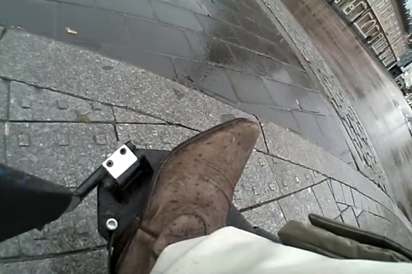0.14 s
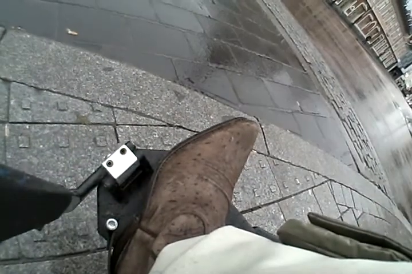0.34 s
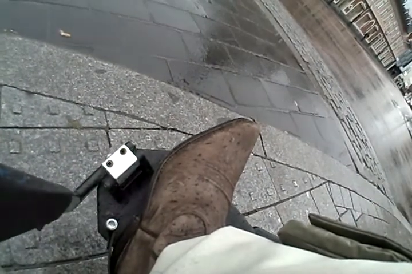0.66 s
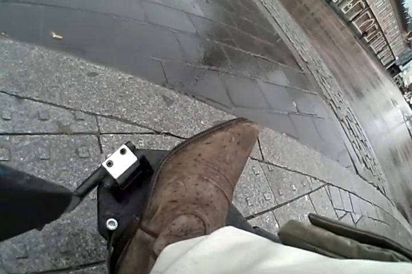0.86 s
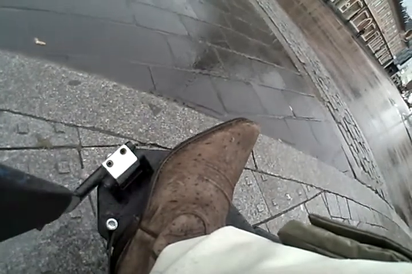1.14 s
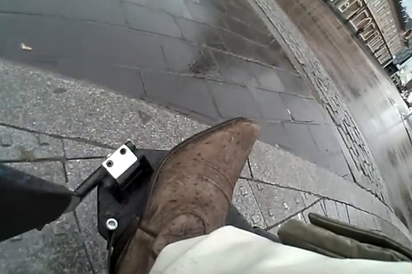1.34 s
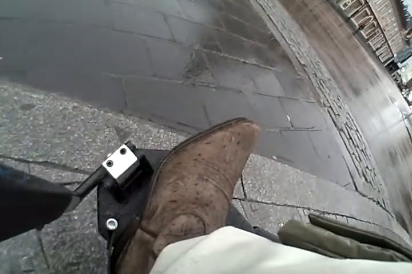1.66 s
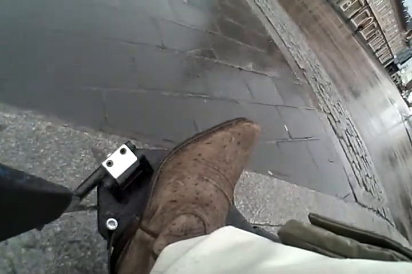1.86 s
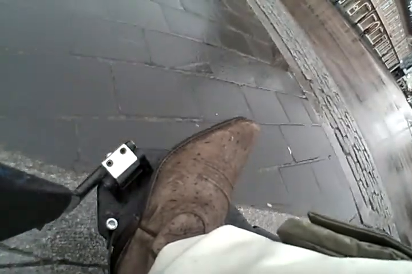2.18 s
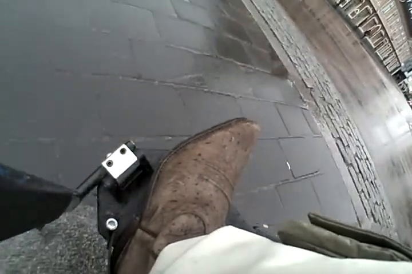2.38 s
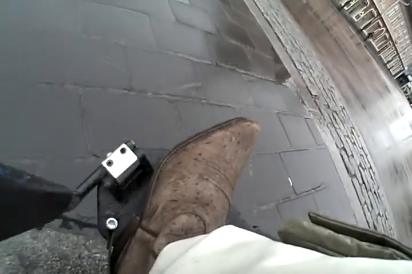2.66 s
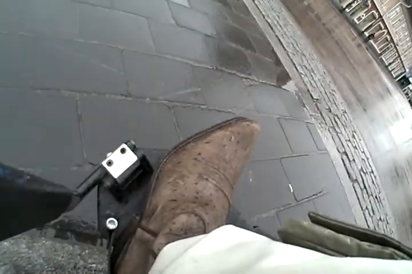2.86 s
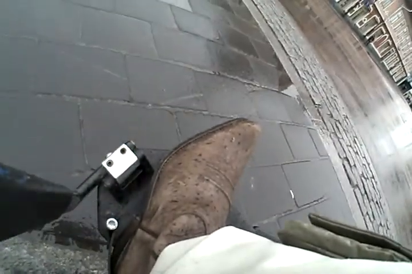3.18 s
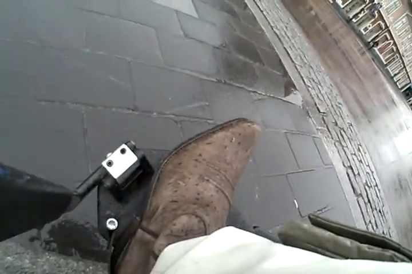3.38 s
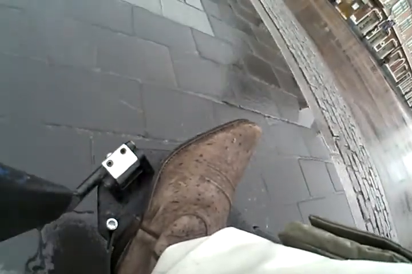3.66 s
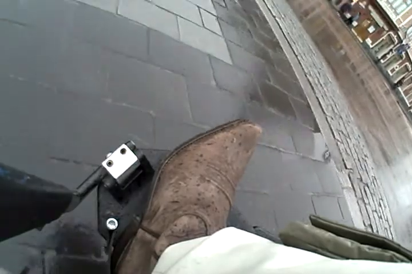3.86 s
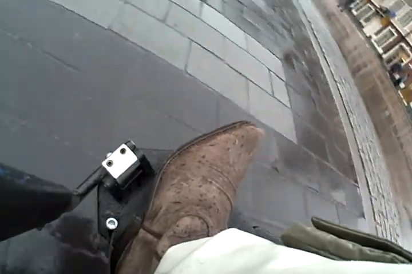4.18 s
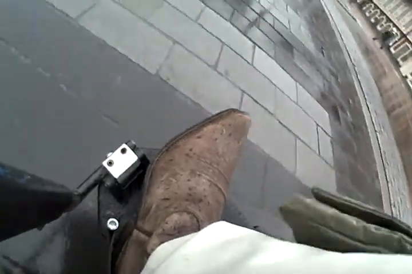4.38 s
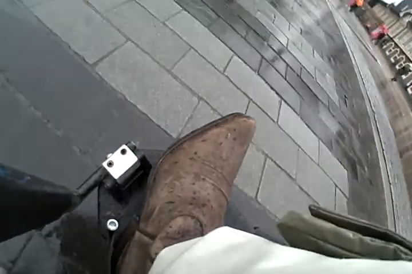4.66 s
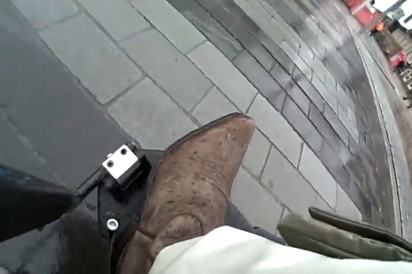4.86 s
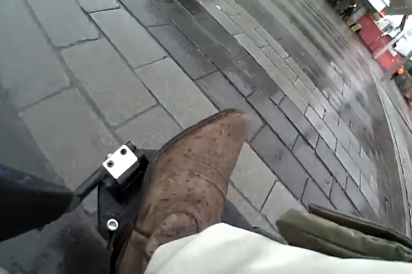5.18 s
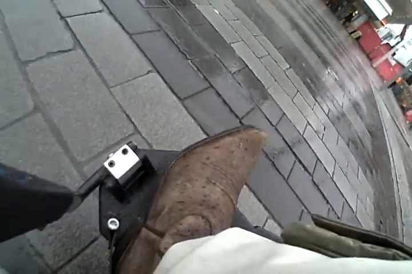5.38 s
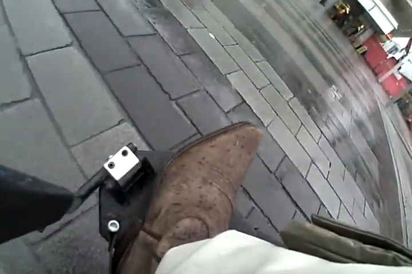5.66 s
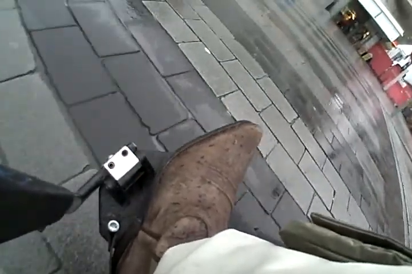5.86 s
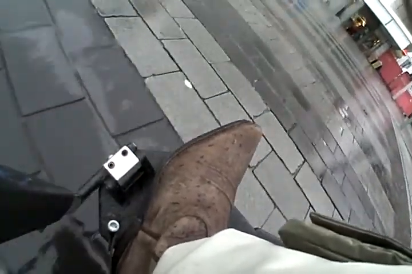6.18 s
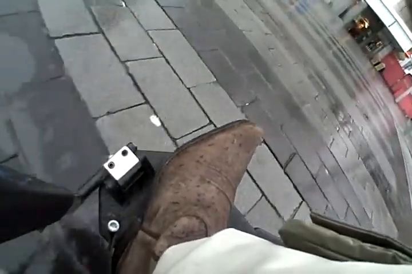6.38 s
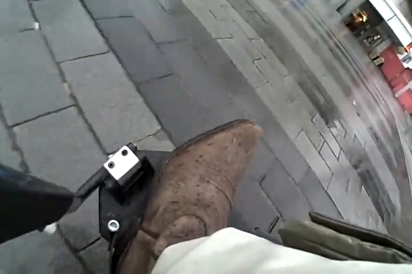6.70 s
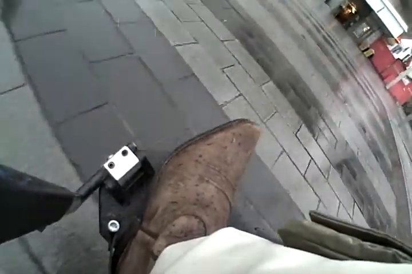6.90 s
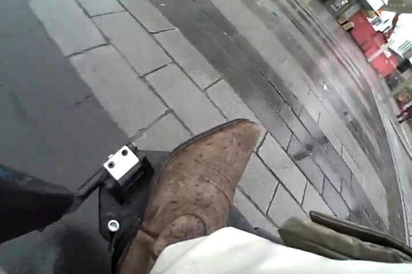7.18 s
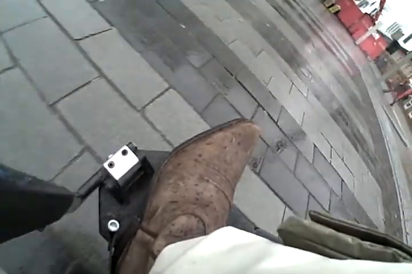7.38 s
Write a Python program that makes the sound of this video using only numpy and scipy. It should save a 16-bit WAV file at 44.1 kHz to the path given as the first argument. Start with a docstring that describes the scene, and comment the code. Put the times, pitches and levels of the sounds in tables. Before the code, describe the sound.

A kick scooter waits by a quiet idling street, swishes onto wet paving, bangs and rattles sharply, then hums away with a rising electric whine.

```python
"""A diesel idles on a wet hissing street where an electric kick scooter waits, its loose fittings ticking.
Then the scooter rolls off the kerb: tyres swish as crackling noise, air and paving rumble as low filtered noise.
Deck and frame clatter over the edges as noise bursts ringing in resonances, and joints chirp as short tones.
Last, the hub motor whines in with partials that climb with the speed. All is heard at the rider's camera."""
import sys
import numpy as np
from scipy import signal
from scipy.fft import rfft, irfft, next_fast_len
from scipy.io import wavfile
from scipy.ndimage import uniform_filter1d

SR = 44100
rng = np.random.default_rng(int(sys.argv[2]) if len(sys.argv) > 2 else 0)


def bounce(signal):
    """Save signal as a 16-bit WAV file at the path given by the first command-line argument."""
    frames = np.transpose(np.atleast_2d(signal))
    limited = np.clip(frames, -1, 1)
    pcm = np.round(limited * 32767).astype(np.int16)
    wavfile.write(sys.argv[1], SR, pcm)


N = 332148
TIME_S = np.arange(N) / SR
TOP_HZ = 8550  # top of the audible band here

# when the scooter starts to roll, the motor takes over, and the street falls behind: (from_s, to_s)
PUSH_OFF, THROTTLE, LEAVING = (3.84, 4.21), (4.8, 5.8), (4.26, 6.1)


def undb(db):
    """Decibels to gain."""
    return 10 ** (np.asarray(db) / 20)


def unit(x):
    """Scale to rms 1."""
    return x / np.sqrt(np.mean(x ** 2))


def curve(rows):
    """A control joined by straight lines in time, held flat outside its rows."""
    return np.interp(TIME_S, *np.transpose(rows))


def ramp(span):
    """Rises evenly from 0 to 1 between two times."""
    start_s, end_s = span
    return np.clip((TIME_S - start_s) / max(end_s - start_s, .001), 0, 1)


def swell(centre_s, half_length_s):
    """A smooth hump of height 1 around a time."""
    return np.exp(-((TIME_S - centre_s) / half_length_s) ** 2)


def walk(rate_hz):
    """Smooth chance with spread 1 that changes rate_hz times a second."""
    steps = (TIME_S * rate_hz).astype(int) % 4096
    held = rng.standard_normal(4096)[steps]
    return unit(uniform_filter1d(held, int(SR / rate_hz)))


def colour(x, points, peaks=(), tilt_db=0):
    """Causal filter of unit power: a broad spectrum with resonances on it, tilted by dB an octave."""
    size = next_fast_len(len(x) + 4096)
    hz = np.maximum(np.fft.rfftfreq(size, 1 / SR), 1)
    point_hz, point_db = np.transpose(points)
    db = np.interp(np.log(hz), np.log(point_hz), point_db)
    db = db + tilt_db * np.log2(np.clip(hz, 300, TOP_HZ))
    for centre_hz, width_hz, lift_db in peaks:
        db = db + lift_db / (1 + (2 * (hz - centre_hz) / width_hz) ** 2)
    power = np.mean(undb(db[hz < TOP_HZ]) ** 2) * TOP_HZ / (SR / 2)
    db = db - 10 * np.log10(power)
    # folding the cepstrum gives minimum phase, so nothing sounds before its cause
    cepstrum = irfft(np.log(undb(db)), size)
    cepstrum[1:size // 2] *= 2
    cepstrum[size // 2 + 1:] = 0
    response = np.exp(rfft(cepstrum))
    return irfft(rfft(x, size) * response, size)[:len(x)]


def grit(spread_db):
    """Dense tiny contacts of uneven size: noise whose level jumps every 16 samples."""
    sizes = np.minimum(rng.exponential(size=N // 16 + 1), 4.5)
    sizes = np.repeat(sizes, 16)[:N]
    return unit(rng.standard_normal(N) * undb(spread_db * sizes))


def chatter(t60_s):
    """A burst of rapid contacts: noise that dies away by 60 dB in t60_s."""
    t = TIME_S[:SR // 3]
    return rng.standard_normal(len(t)) * np.exp(-np.log(1000) * t / t60_s)


def add(out, start_s, x):
    """Mix a sound in at a time."""
    i = int(start_s * SR)
    out[i:i + len(x)] += x[:N - i]


# In every colour table the levels only shape the spectrum: colour() evens out the total power.
# broad colour of the traffic wash: (hz, relative_db_per_hz)
STREET_COLOUR = [(12, -12), (32, 1), (62, -2.5), (85, -7), (190, -15), (270, -16.5), (500, -21.5),
                 (1250, -22), (1550, -26), (1900, -34), (2600, -41), (4600, -42), (5800, -48),
                 (8400, -51.5)]
# hum partials of the idling diesel: (pitch_hz, level_db)
IDLE_HUM = [(33.2, -38.5), (66.4, -38.5), (116.6, -51), (149.5, -54), (182, -52), (199, -53), (296, -58.5),
            (752, -61)]
# bright colour of the wet road's hiss: (hz, relative_db_per_hz)
SIZZLE_COLOUR = [(800, -20.5), (2500, 4), (4500, -1.5), (5800, -2.5), (8300, 1.5)]
# swells in that hiss: (centre_s, half_length_s, level_db)
SIZZLE_SWELLS = [(.43, 0.23, -66.5), (1.72, 0.23, -62), (2.258, 0.33, -60.5)]
STREET_DB, BEHIND_DB = -34, -5.5  # traffic wash, and the change as the street falls behind
SIZZLE_DB, SIZZLE_ROLLING_DB = -67.5, -60.5  # at rest, and added once under way


def street():
    """Traffic as filtered noise, a diesel's idle as wavering low partials, the wet road as fine crackle."""
    wash = undb(STREET_DB + .5 * walk(6.7)) * colour(rng.standard_normal(N), STREET_COLOUR)
    turns = np.cumsum(1 + 0.01202 * walk(9)) / SR  # one uneven clock bends all partials together
    hum = np.zeros(N)
    for pitch_hz, level_db in IDLE_HUM:
        partial = np.sqrt(2) * np.sin(2 * np.pi * (pitch_hz * turns + rng.random()))
        hum += undb(level_db + 2.0 * walk(11)) * partial
    wet = undb(SIZZLE_DB) + undb(SIZZLE_ROLLING_DB) * ramp(PUSH_OFF)
    for centre_s, half_length_s, level_db in SIZZLE_SWELLS:
        wet += undb(level_db) * swell(centre_s, half_length_s)
    sizzle = wet * undb(1.0 * walk(10)) * colour(grit(spread_db=4.5), SIZZLE_COLOUR)
    return (wash + hum) * undb(BEHIND_DB * ramp(LEAVING)) + sizzle


# ticks of loose fittings: (start_s, level_db before the ring is added)
TICKS = [(.716, -45.5), (.766, -49), (0.803, -44), (0.832, -42), (2.241, -44), (2.689, -50), (4.141, -32.5),
         (4.1717, -30.5), (4.3, -31), (4.4018, -32.5), (4.682, -35.5), (4.966, -34.5), (5.061, -31.5),
         (5.185, -35), (5.729, -40), (5.738, -29), (5.751, -30.5), (6.545, -32.5)]
# metallic ring of the fittings: (centre_hz, width_hz, lift_db)
FITTING_RING = [(3741, 250, 11), (4300, 200, 14), (6250, 200, 9), (6680, 200, 10), (8250, 500, 7)]
TICK_T60_S = 0.035
FAINT_TICK_DB, FAINT_SPREAD_DB = -53, 5.5  # chance ticks in between


def fittings():
    """Small metal parts tick and ring briefly, with fainter ticks at chance moments."""
    taps = np.zeros(N)
    faint_s = rng.uniform(0, TIME_S[-1], size=14)
    faint_db = FAINT_TICK_DB + FAINT_SPREAD_DB * rng.standard_normal(size=14)
    for start_s, level_db in TICKS + list(zip(faint_s, faint_db)):
        add(taps, start_s, undb(level_db) * chatter(TICK_T60_S))
    return colour(taps, [(500, -13), (2000, 3.5), (4000, -4.5), (8000, 2.5)], FITTING_RING)


# broad colour of rubber on wet stone: (hz, relative_db_per_hz)
WET_COLOUR = [(200, -12.5), (450, 3), (900, 2.5), (1500, -6.5), (2000, -8.5), (2650, -18.5), (4500, -12),
              (5900, -18.5), (8300, -14)]
# resonances of the tread: (centre_hz, width_hz, lift_db)
TREAD_RESONANCES = [(1620, 30, 9), (3230, 930, 9), (4500, 680, 0.5), (7100, 1000, 8.5)]
# swishes through wet patches: (full_s, length_s, level_db), where full_s is the end of the attack
SWISHES = [(3.504, 0.31, -39), (3.77, .1, -42.5), (3.89, 0.37, -32), (4.47, 0.044, -42),
           (5.01, 0.15, -41.5), (5.17, 0.41, -40)]
SWISH_ATTACK_S, SWISH_RELEASE_S, SWISH_SAG_DB_PER_S = 0.072, .03, 32
ROLLING_DB, DRIVEN_DB = -60.5, -52  # steady hiss when coasting, and added under power


def tyres():
    """Rubber peels off the wet stone with a fine crackle ringing in the tread; swishes start fast and sag."""
    peel = undb(ROLLING_DB) * ramp(PUSH_OFF) + undb(DRIVEN_DB) * ramp(THROTTLE)
    for full_s, length_s, level_db in SWISHES:
        attack = ramp((full_s - SWISH_ATTACK_S, full_s)) ** 2
        release = np.exp(-np.maximum(TIME_S - full_s - length_s, 0) / SWISH_RELEASE_S)
        sagging_db = level_db - SWISH_SAG_DB_PER_S * np.maximum(TIME_S - full_s, 0)
        peel = np.maximum(peel, attack * release * undb(sagging_db))
    return peel * undb(1.0 * walk(25)) * colour(grit(spread_db=3.0), WET_COLOUR, TREAD_RESONANCES)


def shake(points):
    """Random shaking whose strength is evened out over a fifth of a second."""
    x = colour(rng.standard_normal(N), points)
    return x / np.sqrt(uniform_filter1d(x ** 2, SR // 5))


# speed of the wheel, as the motor's cogging rate: (time_s, cogging_hz)
SPEED = [(5.62, 351), (5.88, 381), (6.0, 402.8), (6.4, 503.7), (6.65, 526.4), (7.0, 588.8), (7.25, 591.6),
         (7.53, 607)]


def with_speed(law_db):
    """Level in dB of a sound that grows with every doubling of the speed."""
    start_db, per_doubling_db = law_db
    return start_db + per_doubling_db * np.log2(curve(SPEED) / SPEED[0][1])


# low colour of the air buffeting: (hz, relative_db_per_hz)
BUFFET_COLOUR = [(12, -3), (28, 1), (48, 1), (80, -4.5), (130, -15), (250, -35.5), (600, -52.5)]
# colour of the droning deck: (hz, relative_db_per_hz)
DECK_COLOUR = [(50, -21), (105, 5.5), (170, 0), (240, -7.5), (320, -12), (480, -23), (1000, -39)]
# gusts and lulls of the air at the microphone: (centre_s, half_length_s, change_db)
GUSTS = [(4.406, 0.09, 10), (4.557, 0.03, -10), (4.63, 0.047, 4), (4.83, 0.06, -5), (5.747, 0.098, -12),
         (5.897, 0.053, 3), (7.494, 0.097, 3.5)]
BUFFET_DB, DRONE_DB = (-27, 9.5), (-43.5, 20.5)  # (dB at the starting speed, dB more per doubling)


def rumble():
    """Air buffets the microphone and uneven paving makes the deck drone; both grow with the speed."""
    buffet = shake(BUFFET_COLOUR)
    buffet = buffet - 0.078 * (buffet ** 2 - 1)  # eddies suck harder than they push
    gusts_db = sum(change_db * swell(s, half_s) for s, half_s, change_db in GUSTS)
    buffet = undb(with_speed(BUFFET_DB) + gusts_db) * buffet
    drone = undb(with_speed(DRONE_DB) + 1.5 * walk(35)) * shake(DECK_COLOUR)
    return ramp(PUSH_OFF) * (buffet + drone)


# broad colour of a knock: (hz, relative_db_per_hz)
KNOCK_COLOUR = [(120, -29), (350, -4.5), (900, 3), (1400, -1.5), (3000, -3.5), (4700, -9.5), (5800, -8),
                (8300, -7)]
# resonances of deck and frame: (centre_hz, width_hz, lift_db)
FRAME_RESONANCES = [(368, 99, 7), (595, 20, 9.5), (980, 200, 2), (1467, 110, 6), (2020, 74, 1.5),
                    (2270, 120, 1.5), (2980, 170, 1.5), (4950, 170, 2), (6520, 200, 0.5), (7650, 150, 4)]


def clatter(t60_s, tilt_db, part_hz):
    """The frame clatters as a burst of contacts, with one part ringing out."""
    part = (part_hz, 100 + 0.13 * part_hz, 10.5)  # higher resonances are wider
    return colour(chatter(t60_s), KNOCK_COLOUR, FRAME_RESONANCES + [part], tilt_db)


def thud():
    """The deck thuds under the rider's weight: a low burst with a resonance at 201 Hz."""
    points = [(25, -2), (70, 2), (170, -5), (330, -8.0), (700, -16), (2000, -53.0)]
    return colour(chatter(0.17), points, [(201, 120, 6.5)])


# a wheel drops over an edge:
# (start_s, crack_db, rebound_db, thud_db, shudder_db, tilt_db_per_octave, part_hz)
DROPS = [(4.3218, -9, -25.5, -13, -29, 2, 1690), (5.0159, -15, -18.5, -22.5, -29.5, -2, 8000),
         (5.3088, -7.5, -11.5, -11, -19, 0, 3070)]
# slack joints clack: (start_s, level_db, t60_s, tilt_db_per_octave, part_hz)
CLACKS = [(4.269, -28, 0.037, -1, 2020), (4.5, -32.5, .025, 2.5, 1690), (4.7232, -14, 0.025, -0.5, 5000),
          (5.006, -25, .05, -.5, 8100), (5.038, -16.5, 0.019, -2.5, 2070), (5.2817, -21, 0.024, -1, 2310),
          (5.387, -24.5, .042, 1, 3600), (5.445, -24.5, .025, 2, 1800), (5.545, -26.5, .04, -0.5, 4600),
          (6.001, -31.5, 0.047, -0.5, 5870)]
# dull bumps over paving joints: (start_s, level_db, part_hz)
BUMPS = [(5.071, -31, 1430), (5.243, -28.5, 657), (5.617, -32, 503), (6.133, -32.5, 685), (6.961, -28, 706),
         (7.185, -30.5, 754)]
# the deck flexes with a soft boom: (start_s, level_db, resonance_hz)
BOOMS = [(4.262, -27, 170), (4.375, -23, 130), (4.6, -24.5, 150), (4.871, -32, 125), (5.46, -24, 210)]
# low colour of those booms: (hz, relative_db_per_hz)
BOOM_COLOUR = [(40, -11), (110, 1.5), (210, 1), (330, -12), (700, -27), (2000, -56)]
REBOUND_LAG_S, SHUDDER_LAG_S = .008, 0.03  # after the drop
CRACK_T60_S, REBOUND_T60_S, SHUDDER_T60_S, BUMP_T60_S, BOOM_T60_S = 0.033, 0.069, 0.26, .08, 0.23
REBOUND_HZ, SHUDDER_HZ = 4580, 400  # part that rings out
SHUDDER_TILT_DB, BUMP_TILT_DB = -1.5, -4.5  # per octave


def knocks():
    """Drops crack, thud, rebound and shudder; slack joints clack; paving bumps the frame and booms the deck."""
    out = np.zeros(N)
    for start_s, crack_db, rebound_db, thud_db, shudder_db, tilt_db, part_hz in DROPS:
        crack = undb(crack_db) * clatter(CRACK_T60_S, tilt_db, part_hz)
        rebound = undb(rebound_db) * clatter(REBOUND_T60_S, tilt_db, REBOUND_HZ)
        shudder = undb(shudder_db) * clatter(SHUDDER_T60_S, SHUDDER_TILT_DB, SHUDDER_HZ)
        add(out, start_s, crack + undb(thud_db) * thud())
        add(out, start_s + REBOUND_LAG_S, rebound)
        add(out, start_s + SHUDDER_LAG_S, shudder)
    for start_s, level_db, t60_s, tilt_db, part_hz in CLACKS:
        add(out, start_s, undb(level_db) * clatter(t60_s, tilt_db, part_hz))
    for start_s, level_db, part_hz in BUMPS:
        add(out, start_s, undb(level_db) * clatter(BUMP_T60_S, BUMP_TILT_DB, part_hz))
    for start_s, level_db, resonance_hz in BOOMS:
        boom = colour(chatter(BOOM_T60_S), BOOM_COLOUR, [(resonance_hz, 70, 6)])
        add(out, start_s, undb(level_db) * boom)
    return out


# squeaks of the joints: (centre_s, pitch_hz, level_db, half_length_s)
SQUEAKS = [(4.266, 2110, -46, 0.0063), (5.366, 2240, -35, .008), (5.3943, 2150, -20.5, 0.0038),
           (5.45, 8430, -37, 0.017)]


def squeaks():
    """A joint slips under load with a very short chirp: a wavering sine under a smooth hump."""
    out = np.zeros(N)
    waver = np.cumsum(1 + .012 * walk(300)) / SR
    for centre_s, pitch_hz, level_db, half_length_s in SQUEAKS:
        chirp = np.sqrt(2) * np.sin(2 * np.pi * pitch_hz * waver)
        out += undb(level_db) * swell(centre_s, half_length_s) * chirp
    return out


# upper partials of the motor, before the shell colours them: (multiple of the cogging rate, relative_db)
MOTOR_ORDERS = [(3.25, -18), (3.68, -17), (4.57, -17), (5.36, -20), (6.2, -17), (7.15, -20)]
# broad colour of the drive noise: (hz, relative_db_per_hz)
DRIVE_COLOUR = [(300, -19.5), (600, -0.5), (900, -5.5), (1300, -8), (1900, -4.5), (2500, -7.5),
                (3200, -5.5), (4800, -13), (6200, -12), (8400, -9.5)]
# resonances of the motor shell: (centre_hz, width_hz, lift_db)
SHELL_RESONANCES = [(1470, 90, 3), (2000, 250, 4), (2705, 50, 5), (3050, 150, 3), (3640, 90, 8),
                    (4280, 130, 3), (5750, 120, 3), (7100, 320, 6), (7960, 200, 4), (8400, 200, 4)]
# resonances that the whine climbs through: (centre_hz, width_hz, lift_db)
WHINE_PEAKS = [(762, 74, 14), (1015, 50, 6), (1184, 29, 9.5)]
DRIVE_DB, WHINE_DB = (-48, 9), (-60.5, 8)  # (dB at the starting speed, dB more per doubling)


def motor():
    """Cogging tones climb with the speed and light up as they cross the resonances of frame and shell."""
    cogging_hz = curve(SPEED)
    turns = np.cumsum(cogging_hz * (1 + 0.0055 * walk(45))) / SR

    def tone(multiple):
        """One partial, its level fluttering at random."""
        return undb(2 * walk(20)) * np.sqrt(2) * np.sin(2 * np.pi * multiple * turns)

    # the frame carries the lowest tone best near its first resonance
    first_hz = FRAME_RESONANCES[0][0]
    lowest_db = -10.5 + 11.5 / (1 + ((cogging_hz - first_hz) / 60) ** 2)
    whine_hz = 2 * cogging_hz
    lift_db = 0
    for centre_hz, width_hz, peak_db in WHINE_PEAKS:
        lift_db = lift_db + peak_db / (1 + (2 * (whine_hz - centre_hz) / width_hz) ** 2)
    whine = undb(with_speed(WHINE_DB) + lift_db) * (tone(2) + undb(lowest_db) * tone(0.97))
    upper = sum(undb(order_db) * tone(multiple) for multiple, order_db in MOTOR_ORDERS)
    shell = colour(grit(spread_db=2.0) + undb(-6.5) * upper, DRIVE_COLOUR, SHELL_RESONANCES)
    return ramp(THROTTLE) * (whine + undb(with_speed(DRIVE_DB) + 0.64 * walk(23)) * shell)


def scene():
    """Everything at the rider's camera, in the open air, as one channel."""
    mix = street() + fittings() + tyres() + rumble() + knocks() + squeaks() + motor()
    return mix[None]


def record(dry):
    """The camera rounds the loudest peaks and cuts the top steeply."""
    ceiling = 0.62
    rounded = ceiling * np.tanh(dry / ceiling)
    steep_cut = signal.ellip(12, .2, 70, TOP_HZ, fs=SR, output="sos")
    return signal.sosfilt(steep_cut, rounded)


dry = scene()
out = record(dry)
bounce(out)
```